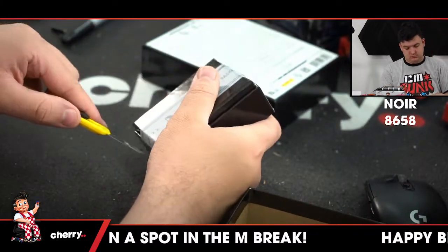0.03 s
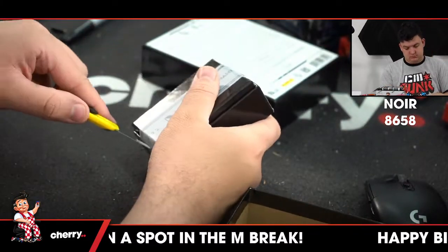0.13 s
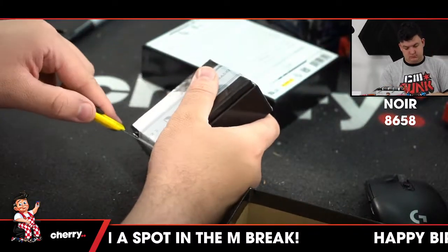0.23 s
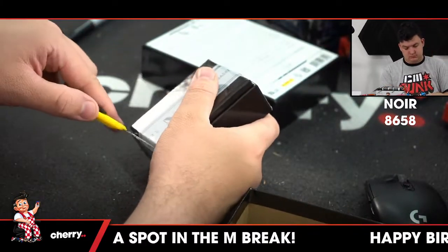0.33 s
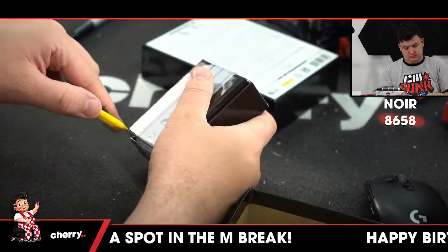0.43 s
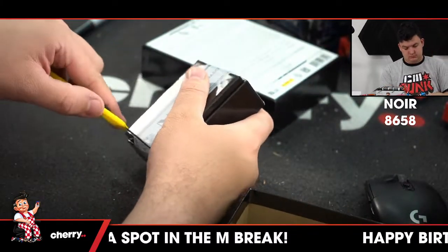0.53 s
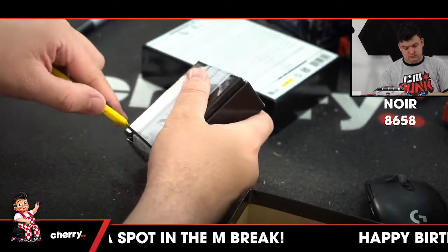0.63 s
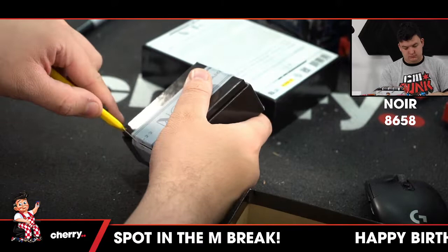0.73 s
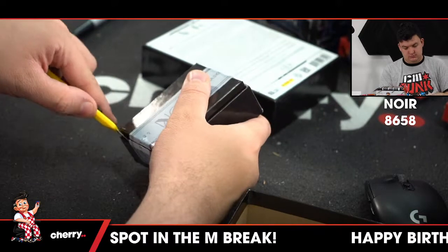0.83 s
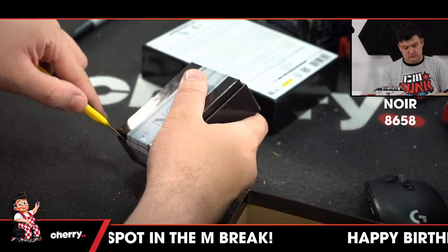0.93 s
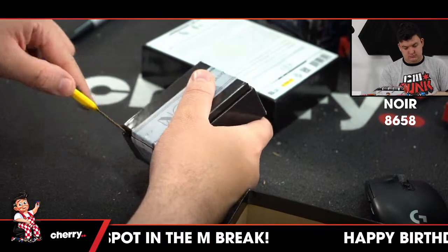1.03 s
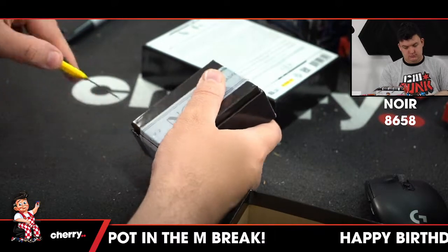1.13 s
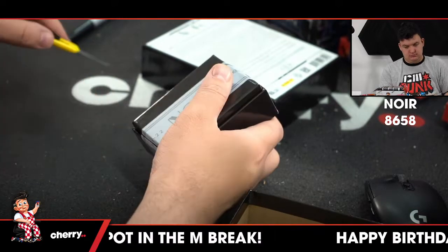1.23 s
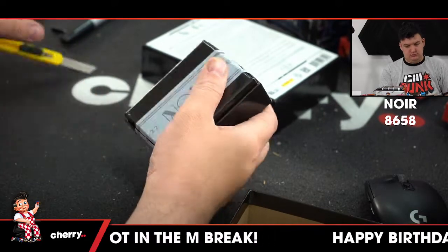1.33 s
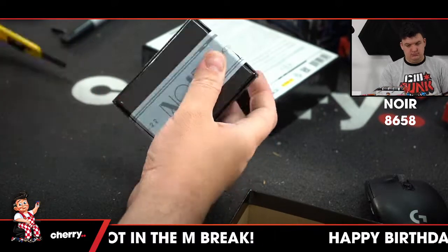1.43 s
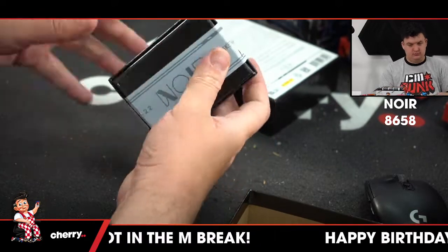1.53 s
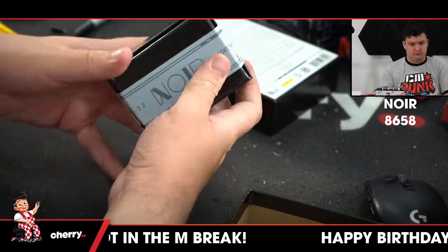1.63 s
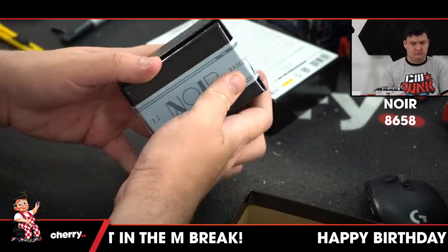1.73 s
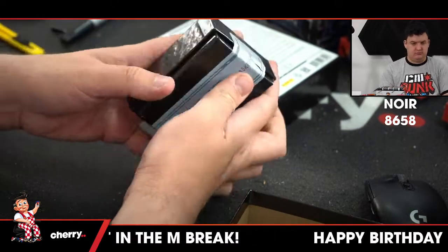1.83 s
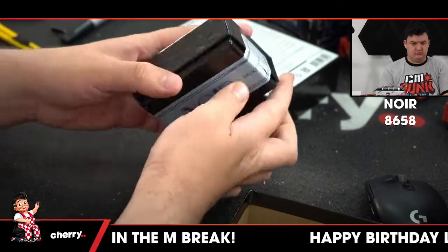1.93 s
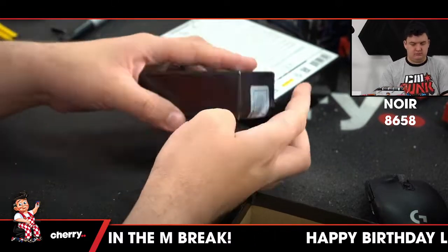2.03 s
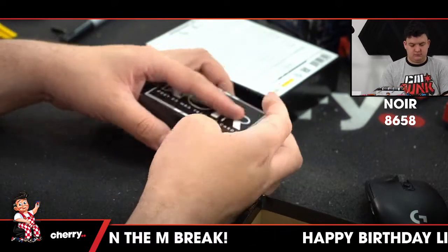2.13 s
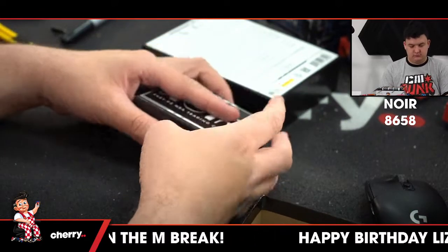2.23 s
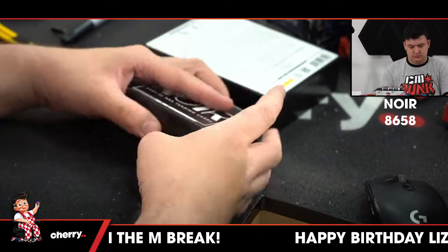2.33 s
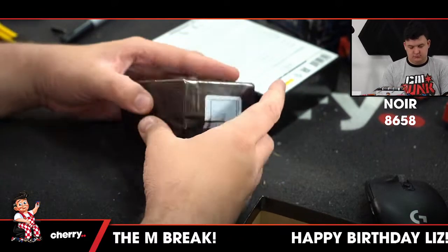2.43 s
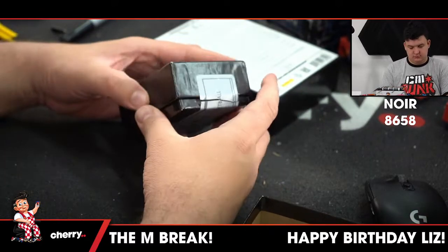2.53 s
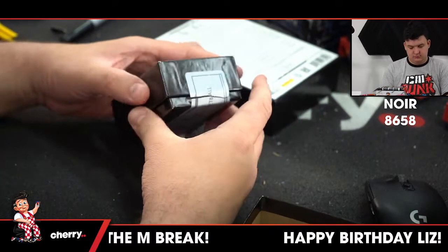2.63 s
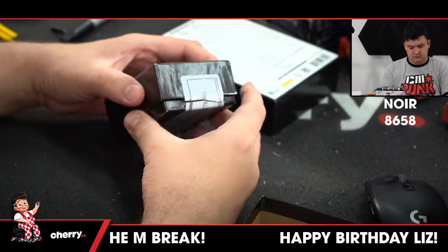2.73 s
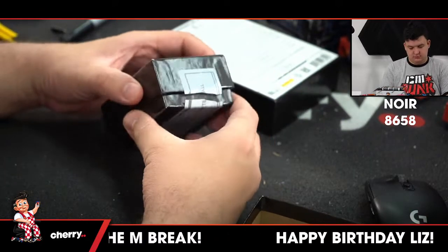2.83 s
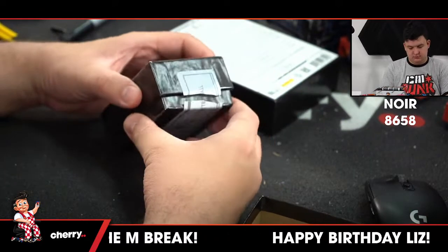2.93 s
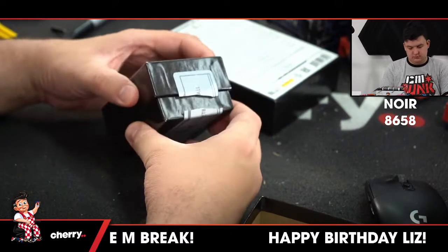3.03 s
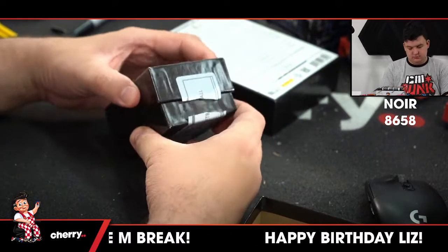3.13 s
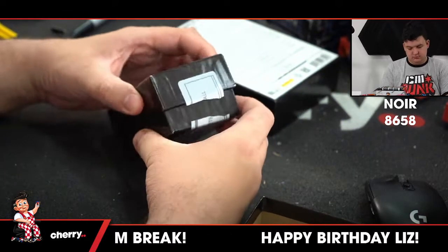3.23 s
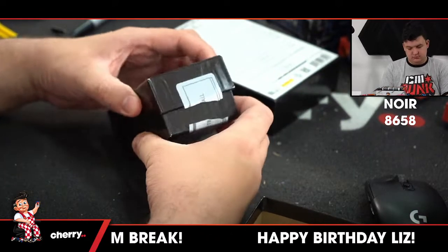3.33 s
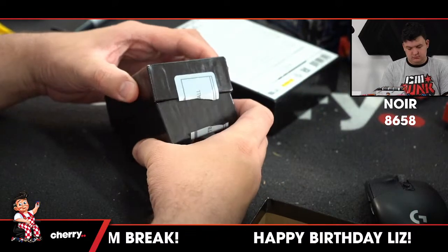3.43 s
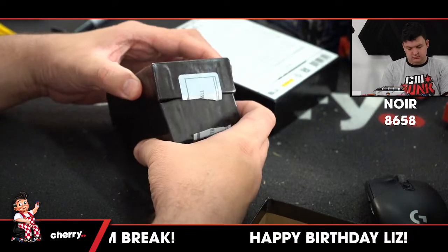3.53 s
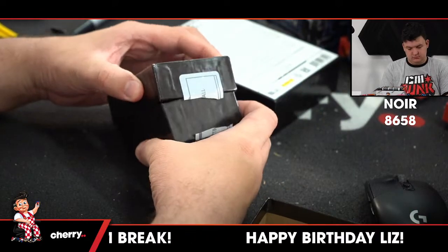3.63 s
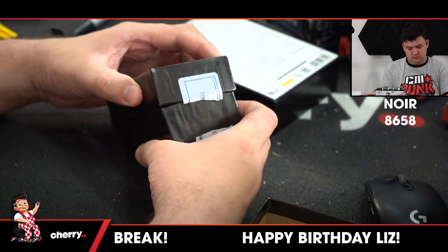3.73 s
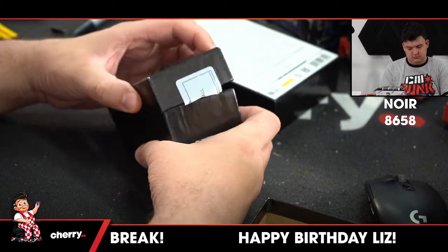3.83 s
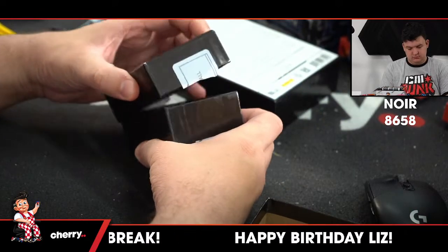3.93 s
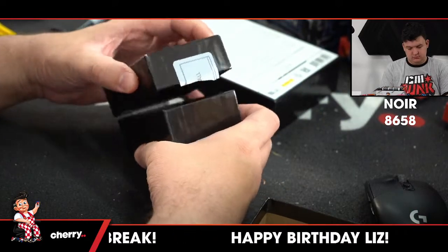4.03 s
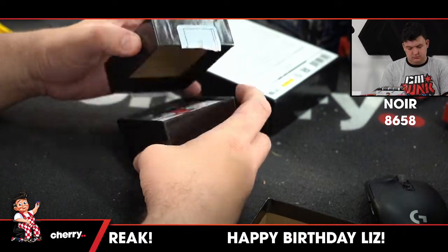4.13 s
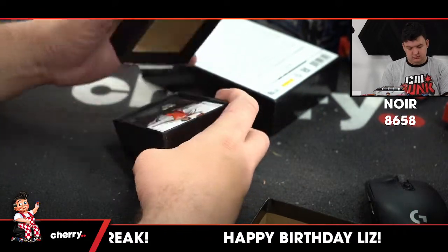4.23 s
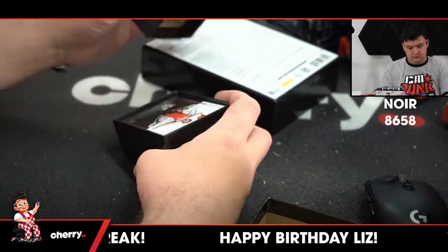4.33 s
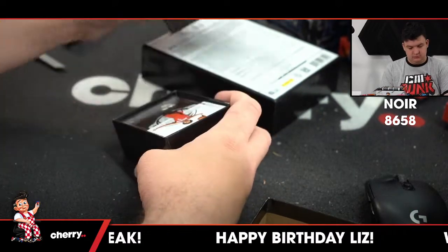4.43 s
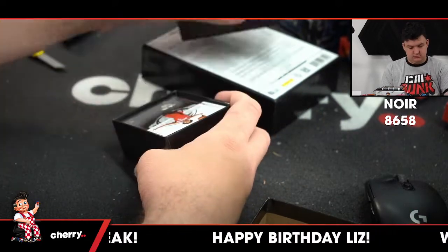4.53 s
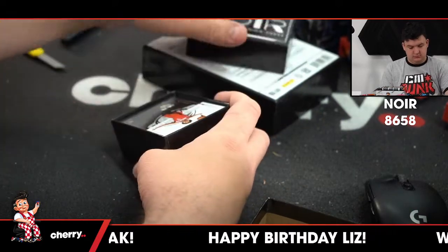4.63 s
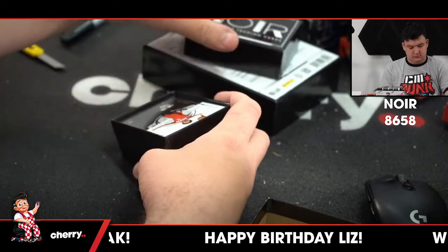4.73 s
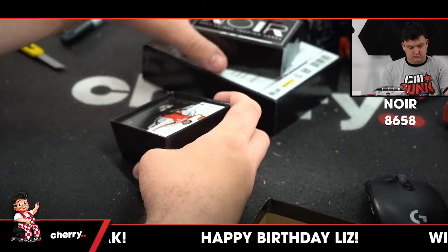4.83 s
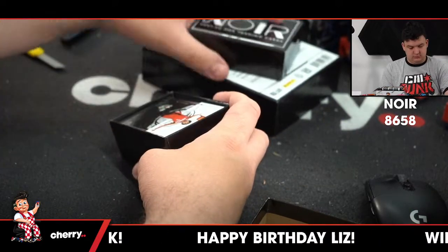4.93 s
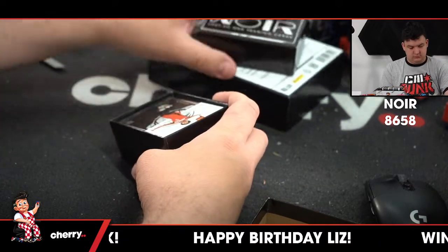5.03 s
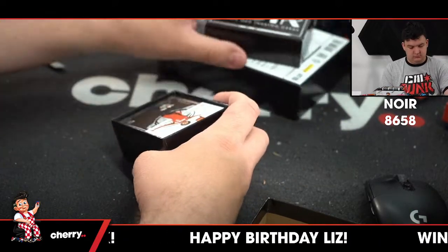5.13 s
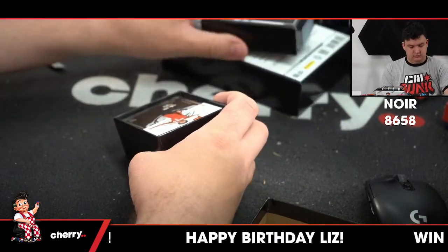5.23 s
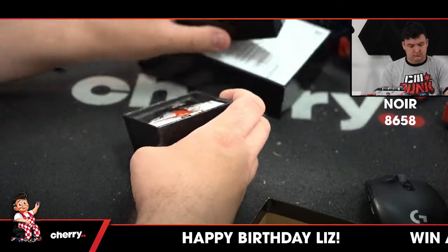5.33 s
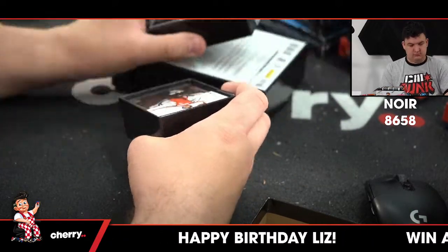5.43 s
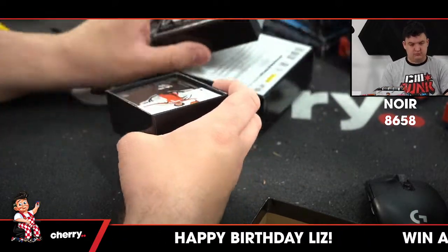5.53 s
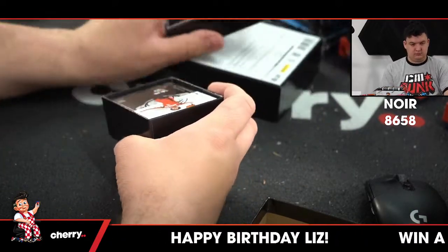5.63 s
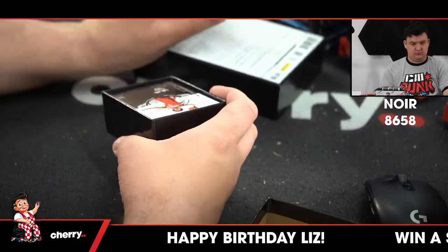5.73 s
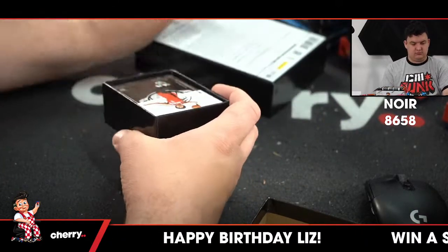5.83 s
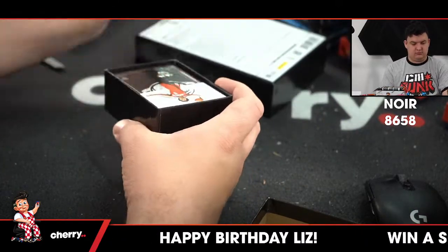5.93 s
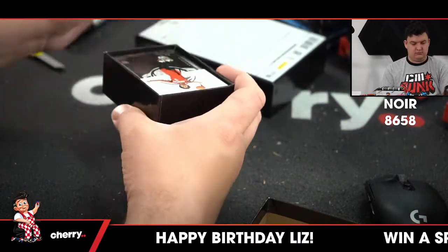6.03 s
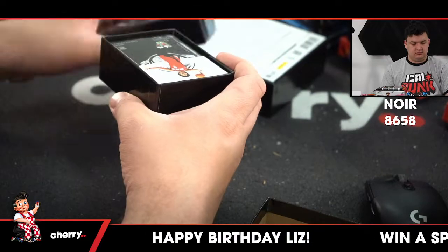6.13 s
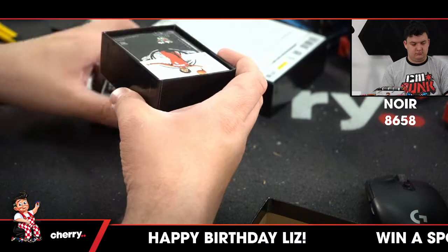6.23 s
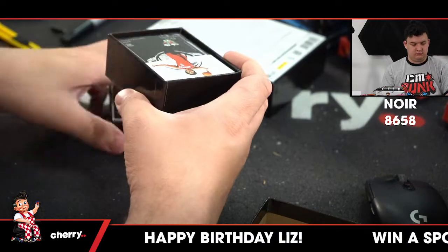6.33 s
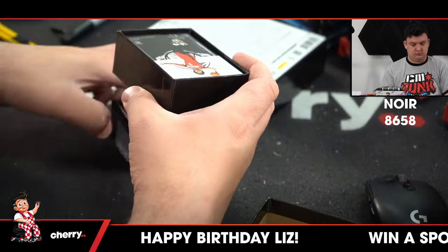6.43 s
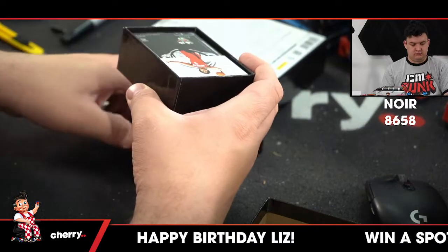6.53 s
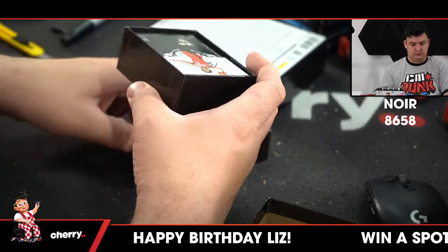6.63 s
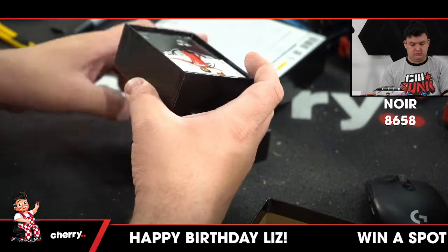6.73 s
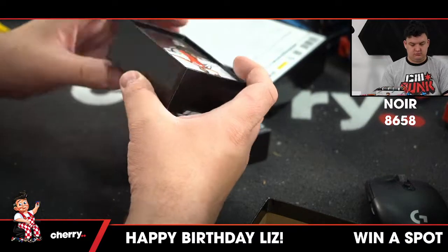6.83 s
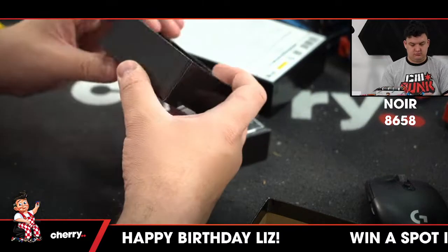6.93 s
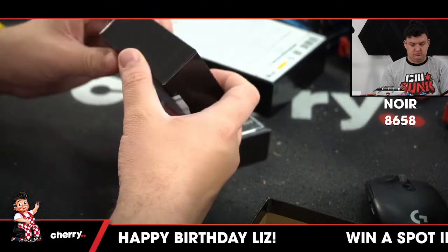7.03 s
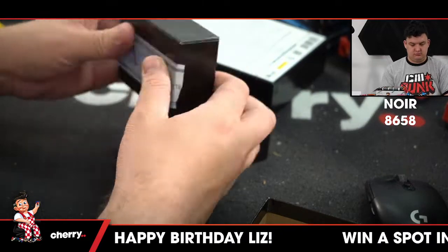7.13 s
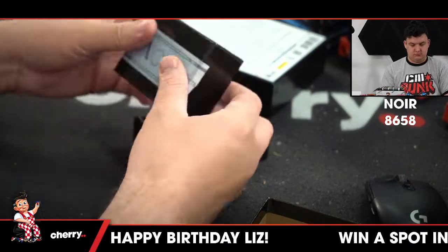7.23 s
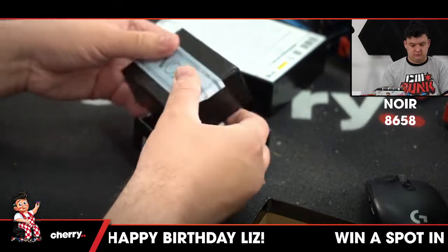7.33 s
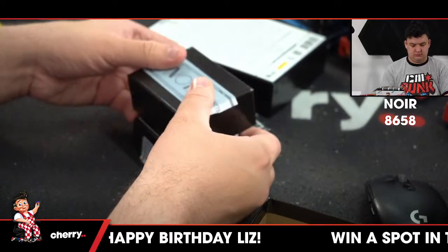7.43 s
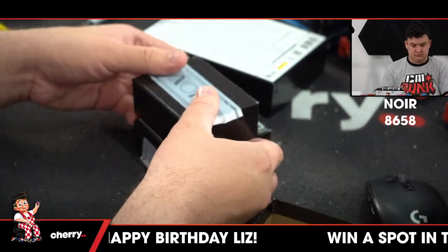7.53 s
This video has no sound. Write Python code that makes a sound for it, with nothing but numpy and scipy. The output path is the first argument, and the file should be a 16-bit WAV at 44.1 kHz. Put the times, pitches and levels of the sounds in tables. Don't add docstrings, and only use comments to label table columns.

```python
import sys
import numpy as np
from scipy import signal
from scipy.fft import rfft, irfft
from scipy.io import wavfile
from scipy.ndimage import uniform_filter1d

SR = 44100
rng = np.random.default_rng(int(sys.argv[2]) if len(sys.argv) > 2 else 0)


def convert_level_to_amplitude(level_db):
    exponent = np.asarray(level_db, float) / 20
    return 10 ** exponent


def put_to_file(sound):
    columns = np.atleast_2d(sound).T
    safe = np.clip(columns, -1, 1)
    whole_steps = np.round(safe * 32767)
    wavfile.write(sys.argv[1], SR, whole_steps.astype(np.int16))


N = 335020

# frequency_hz, level_db_per_hz
AIR_SPECTRUM = [(15, -27), (25, -7.5), (84, -7.5), (108, -12), (190, -8.5), (263, -7), (326, -11),
                (416, -11), (516, -13.5), (734, -13.5), (936, -17), (1370, -13), (1840, -29.5), (8140, -37),
                (16000, -41.5)]
# frequency_hz, side_re_mid_db
AIR_SIDE = [(60, -50), (200, -19), (500, -11.5), (1300, -11.5), (2400, 2), (4400, -3.5), (7000, -1),
            (7700, -22), (15000, -16)]
# centre_hz, width_hz, gain_db
DUCT_PEAKS_AND_DIPS = [(30.2, 8.9, -4), (60.5, 6.3, -10), (103, 12, -3), (133.2, 27.4, 10.5), (181, 17, 6),
                       (658.5, 15.5, 12), (801, 85, 7), (1096, 44, 6.5), (1290, 39, 4.5)]
# pitch_hz, level_db
FAN_TONES = [(46, -77), (80, -71)]

# frequency_hz, t60_s
ROOM_T60 = [(100, 0.72), (300, 0.6), (1000, 0.59), (3000, 0.47), (8000, 0.36), (15000, 0.28)]
# frequency_hz, level_db
ROOM_TONE = [(100, 1.5), (300, 1.4), (1000, 2.5), (2500, -1), (6000, -5), (15000, -2)]
# frequency_hz, side_re_mid_db
ROOM_SIDE = [(100, -44), (300, -23.5), (1000, -15.5), (4000, -11.5), (7000, -10.5), (9000, -28)]
# frequency_hz, gain_db, lag_rad
RIGHT_CAPSULE = [(200, .1, .04), (700, .4, .2), (1500, .5, .38), (6000, .8, .55), (8000, 1.1, .15),
                 (14000, 1.3, .1)]

# start_s, scrape_db, drone_db
FLICKS = [(0.516, -74, -69), (0.776, -49.5, -60), (1.075, -75, -70), (2.016, -67.5, -60.5),
          (7.25, -69, -62), (2.884, -63.5, -55.5), (3.08, -76, -60), (3.128, -83, -65), (3.278, -75, -58.5),
          (3.433, -67, -57), (3.894, -67, -53), (4.18, -71, -62), (5.952, -69, -63), (6.95, -70, -66),
          (7.13, -70, -70)]
# start_s, hold_s, scrape_db, drone_db
DRAGS = [(0.825, 0.21, -71, -66.5), (1.12, 0.25, -77.5, -81), (1.703, 0.25, -68, -75),
         (2.104, .11, -66.5, -66), (2.453, 0.096, -69, -73), (2.772, 0.06, -81, -78), (3.02, .1, -86, -78),
         (2.652, 0.054, -70.5, -78), (4.34, 0.15, -74, -69.5), (5.066, 0.064, -65.5, -55),
         (5.153, 0.073, -60, -56), (5.335, 0.082, -68, -61.5), (5.491, 0.037, -57.5, -54.5),
         (6.146, 0.16, -76, -67), (6.339, 0.11, -57, -62), (6.527, 0.12, -58.5, -59),
         (7.327, 0.1, -76, -73.5), (7.437, 0.11, -70.5, -72)]
# frequency_hz, level_db_per_hz
RUB_TONE = [(120, -33.5), (200, -2.5), (278, -5), (327, 3), (378, -9.5), (479, -5), (798, -10.5),
            (2300, -24.5), (4300, -19.5), (8200, -21.5), (15500, -39)]

# start_s, crack_db, thud_db, length_ms
BLADE = [
    (0.5133, -74, -82, 3.3),
    (0.5247, -62, -69, 4),
    (0.5374, -82, -77, 2.5),
    (0.7723, -48.5, -76, 3.7),
    (0.7868, -49, -53.5, 1),
    (0.9383, -64, -63, 1.5),
    (1.1056, -66, -65, 4.4),
    (1.1363, -69, -74, 3.3),
]
# start_s, crack_db, thud_db, length_ms
CUTTER = [
    (1.3947, -57, -64, 9.2),
    (1.4025, -43, -54, 15),
    (1.4345, -31, -34, 16),
    (1.4403, -35, -44, 16),
    (1.4584, -54, -68, 6.6),
    (1.533, -41.5, -63, 3.6),
    (1.5624, -53, -41, 3.3),
    (1.5663, -35, -42.5, 5.7),
    (1.6217, -41.5, -52, 7),
    (1.6652, -49, -53.5, 5.6),
]
# start_s, crack_db, thud_db, length_ms
THUMB = [
    (2.198, -56, -32.5, 3.17),
]
# start_s, crack_db, thud_db, length_ms
FINGERS = [(2.8893, -58.5, -51, 3.7), (3.05, -64, -64, 5), (3.1264, -82, -49, 2.1), (3.2774, -63, -69, 6.5),
           (3.8706, -61, -55.5, 5), (3.8931, -60, -67, 5), (4.1794, -54, -70, 5.4),
           (5.9539, -57.5, -77, 3.7), (6.0561, -64, -66, 5), (7.1192, -68, -92, 6.1), (7.5492, -61, -78, 4)]
# start_s, crack_db, thud_db, length_ms
LID = [
    (4.646, -59, -57, 3.4),
    (4.6577, -37, -40.5, 4.4),
    (4.663, -29, -28.5, 2.17),
    (5.1686, -58, -47.5, 7.7),
    (5.2916, -80, -78, 1.9),
]
# start_s, crack_db, thud_db, length_ms
KNOCK = [
    (5.5657, -38, -39.5, 1.47),
    (5.6693, -39, -57, 0.57),
    (5.6722, -34.5, -40, 1.9),
    (5.6783, -32, -39, 2),
    (5.6848, -41.5, -36.5, 1.8),
    (5.6917, -39, -62, 0.99),
    (5.699, -38, -51, 0.36),
]
# start_s, crack_db, thud_db,
# length_ms
TRAY = [(5.443, -60, -54.5, 2.2), (6.296, -63, -27.5, 4.7), (6.317, -57, -39, 2.5), (6.333, -60, -46, 3.9),
        (6.355, -52, -49, 3.1), (6.362, -46.5, -45, 0.91), (6.642, -55, -70, 2.4), (3.432, -68, -54, 4),
        (7.562, -85, -49.5, 9.1), (5.18, -78, -45.5, 6), (5.225, -70, -46, 10)]

# frequency_hz, level_db_per_hz
BLADE_TONE = [(120, -51), (200, -26), (321, -16), (653, -11), (812, -6), (1400, -19), (2700, -12.5),
              (3600, -10), (9140, 0.5), (15500, -18)]
CUTTER_TONE = [(60, -49), (120, -7), (330, -1.5), (540, 4), (800, -6.5), (1300, -15), (2200, -23.5),
               (3500, -17), (5200, -6), (9000, -8), (15500, -25)]
THUMB_TONE = [(41, -26), (80, -5), (130, 1), (190, 0), (280, -12), (500, -22), (1000, -25), (2000, -32),
              (3000, -44), (15500, -66)]
FINGER_TONE = [(120, -33), (200, 3), (728, 5.5), (842, 9), (940, -32), (1030, -10), (1540, -12),
               (8200, -14.5), (15500, -34)]
LID_TONE = [(60, -47), (110, -10), (250, 4), (380, 5), (600, 3), (950, -3.5), (1500, -11), (2500, -17),
            (4500, -23.5), (9000, -37), (15500, -59)]
KNOCK_TONE = [(60, -36), (100, -11), (250, -1.5), (500, 1), (1000, -4.5), (1750, -4), (2200, -15),
              (4500, -10), (9500, -18.5), (15500, -28.5)]
TRAY_TONE = [(60, -37), (120, -8), (220, 0.5), (320, 6), (420, 0), (560, 3.5), (900, -13.5), (1300, -21.5),
             (2000, -32.5), (4500, -26.5), (15500, -57)]
# centre_hz, width_hz, gain_db
BLADE_RING = [(4540, 670, 12.4), (5840, 830, 7.9), (9100, 540, 2)]
CUTTER_RING = [(535, 92, 4.5), (5600, 300, 2.5), (6130, 200, 6.5), (8700, 270, 3.5)]
LID_RING = [(343, 140, 4.5), (586, 64, 6), (880, 130, 4.5), (1520, 130, 6)]
KNOCK_RING = [(323, 38, 10.3), (507, 81, 9.2), (817, 77, 6.6), (959, 54, 9.5), (1527, 41, 6.9),
              (3600, 320, 0.79)]

SPLIT_HZ = 2150
HOP = 32


def curve(table, hz):
    table_hz, value = np.transpose(table)
    return np.interp(np.log(np.maximum(hz, 1)), np.log(table_hz), value)


def spectrum_db(tone, rings, hz):
    peaks_db = sum(gain_db / (1 + (2 * (hz - f) / width_hz) ** 2) for f, width_hz, gain_db in rings)
    return curve(tone, hz) + peaks_db


def unit(x):
    return x / np.sqrt(np.mean(x ** 2))


def walk(rate_hz):
    k = int(SR / rate_hz)
    held = np.repeat(rng.standard_normal(N // k + 1), k)
    return 1.96 * uniform_filter1d(uniform_filter1d(held, k), k)[:N]


def ventilation():
    hz = np.fft.rfftfreq(N, 1 / SR)
    mid_db = spectrum_db(AIR_SPECTRUM, DUCT_PEAKS_AND_DIPS, hz)
    side_db = mid_db + curve(AIR_SIDE, hz)
    mid, side = irfft(rfft(rng.standard_normal((2, N))) * convert_level_to_amplitude([mid_db, side_db]), N)
    gain = convert_level_to_amplitude(-64 + 0.4 * walk(1.5)) / np.sqrt(np.mean(mid ** 2))
    tones = np.zeros(N)
    for pitch_hz, level_db in FAN_TONES:
        level = convert_level_to_amplitude(level_db + 3.0 * walk(4.4))
        phase = 2 * np.pi * np.cumsum(pitch_hz * (1 + 0.097 * walk(8.1))) / SR
        tones += level * np.sin(phase)
    return gain * np.array([mid + side, mid - side]) + tones


def room(feed, wet_db, gap_ms=2.76, build_ms=8.1):
    t = np.arange(int(0.9 * SR)) / SR
    hz = np.fft.rfftfreq(len(t), 1 / SR)
    tail = np.zeros((2, len(t)))
    build = np.clip((t * 1000 - gap_ms) / build_ms, 0, 1)
    for centre_hz in 45 * 2 ** np.arange(0, 8.7, 0.25):
        octaves = np.log2(np.maximum(hz, 1) / centre_hz)
        band = np.cos(np.pi * np.clip(2 * octaves, -0.5, 0.5))
        fade = build * convert_level_to_amplitude(-60 * t / curve(ROOM_T60, centre_hz))
        noise = fade * irfft(rfft(rng.standard_normal((2, len(t)))) * band, len(t))
        even = np.sqrt(np.mean(band ** 2) * np.sum(fade ** 2) / np.sum(noise ** 2, axis=1))
        side_db = np.array([0, curve(ROOM_SIDE, centre_hz)])
        level = even * convert_level_to_amplitude(wet_db + curve(ROOM_TONE, centre_hz) + side_db)
        tail += noise * level[:, None]
    mid, side = signal.fftconvolve(feed[None], tail, axes=1)[:, :N]
    return np.array([mid + side, mid - side])


def capsules(direct):
    treble = signal.butter(4, 9500, "high", fs=SR, output="sos")
    side = convert_level_to_amplitude(-6) * np.roll(signal.sosfilt(treble, direct), 3)
    return np.array([direct + side, direct - side])


def colour(tone, rings=()):
    hz = np.linspace(0, SR / 2, 2049)
    cepstrum = irfft(spectrum_db(tone, rings, hz) * np.log(10) / 20)
    cepstrum[1:2048] *= 2
    cepstrum[2049:] = 0
    response = irfft(np.exp(rfft(cepstrum)))
    parts = []
    for kind, sign in (("high", -1), ("low", 1)):
        split = signal.butter(2, SPLIT_HZ, kind, fs=SR, output="sos")
        part = signal.sosfilt(split, response)
        parts.append(sign * part / np.sqrt(np.sum(part ** 2)))
    return np.array(parts)


def stroke(start_s, attack_s, hold_s, fade_db_s):
    t = np.arange(0, N, HOP) / SR - start_s
    rise = np.sin(np.pi / 2 * np.clip(1 + t / attack_s, 0, 1)) ** 2
    return rise * convert_level_to_amplitude(-fade_db_s * np.clip(t - hold_s, 0, 1))


def rubs():
    level = 0
    for start_s, *level_db in FLICKS:
        level = level + np.outer(convert_level_to_amplitude(level_db), stroke(start_s, 0.01, 0.0053, 180))
    for start_s, hold_s, *level_db in DRAGS:
        level = level + np.outer(convert_level_to_amplitude(level_db), stroke(start_s, 0.073, hold_s, 228))
    level = uniform_filter1d(np.repeat(level, HOP, axis=1), size=HOP)[:, :N]
    slips = rng.random(N) < 1500 / SR
    grains = slips * np.sign(rng.standard_normal(N)) * convert_level_to_amplitude(2 * rng.standard_normal(N))
    hiss = rng.standard_normal(N)
    drag = unit(1.2 * unit(grains) + hiss) * convert_level_to_amplitude(1.3 * walk(40))
    return signal.oaconvolve(level * drag, colour(RUB_TONE), axes=1).sum(axis=0)[:N]


def contacts(events, tone, rings=(), *, gain_db, push, room_db):
    out = np.zeros(N + 8192)
    t = np.arange(2048) / SR
    body = colour(tone, rings)
    for start_s, crack_db, thud_db, length_ms in events:
        fade = np.exp(-t * 500 / np.clip(length_ms, 0.3, 12))
        swell = 1 - np.exp(-t / 0.00036)
        grit = rfft(rng.standard_normal(len(t)) * fade * swell)
        burst = irfft(grit / np.abs(grit) ** 0.95) * fade
        burst = burst / np.sqrt(np.sum(burst ** 2))
        burst[0] += push
        levels = convert_level_to_amplitude(np.array([crack_db, thud_db]) + gain_db)
        sound = signal.fftconvolve(burst, levels @ body)
        start = int(start_s * SR)
        out[start:start + len(sound)] += sound
    return np.outer([1, convert_level_to_amplitude(room_db)], out[:N])


def scene():
    hits = contacts(BLADE, BLADE_TONE, BLADE_RING, gain_db=14.5, push=0.74, room_db=5.0)
    hits += contacts(CUTTER, CUTTER_TONE, CUTTER_RING, gain_db=20.5, push=0.05, room_db=0.7)
    hits += contacts(THUMB, THUMB_TONE, gain_db=18.0, push=0.7, room_db=-1.5)
    hits += contacts(FINGERS, FINGER_TONE, gain_db=15.0, push=0.15, room_db=-0.2)
    hits += contacts(LID, LID_TONE, LID_RING, gain_db=22.5, push=0.065, room_db=1.04)
    hits += contacts(KNOCK, KNOCK_TONE, KNOCK_RING, gain_db=23.5, push=0.72, room_db=-1.0)
    hits += contacts(TRAY, TRAY_TONE, gain_db=17.0, push=0.77, room_db=0.6)
    direct, feed = hits + convert_level_to_amplitude(-9.5) * rubs()
    return ventilation() + room(feed, wet_db=-29.5) + capsules(direct)


def low_pass(x):
    return signal.sosfilt(signal.butter(12, 16530, fs=SR, output="sos"), x)


def record(dry):
    hz = np.fft.rfftfreq(N, 1 / SR)
    capsule = np.array(RIGHT_CAPSULE)
    gain_db = curve(capsule[:, [0, 1]], hz)
    lag_rad = curve(capsule[:, [0, 2]], hz)
    right = convert_level_to_amplitude(gain_db) * np.exp(-1j * lag_rad)
    top = 1 / np.sqrt(1 + (hz / 15750) ** 200)
    mix = irfft(rfft(dry) * [top, top * right], N)
    return low_pass(mix)


dry = scene()
out = record(dry)
put_to_file(out)
```